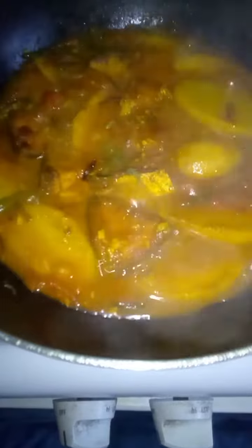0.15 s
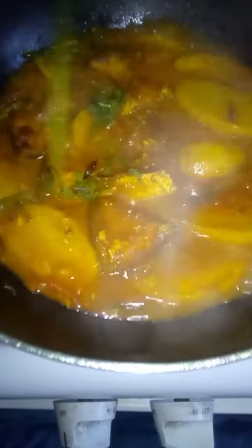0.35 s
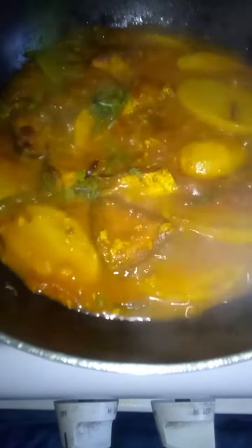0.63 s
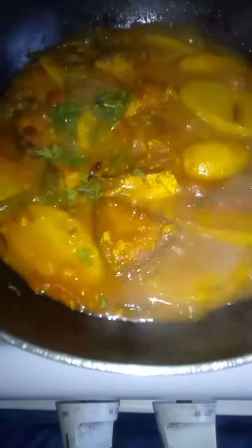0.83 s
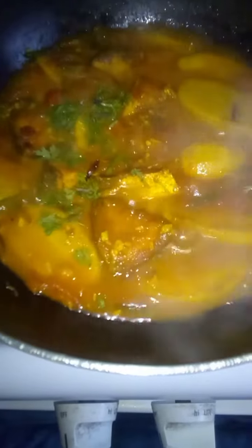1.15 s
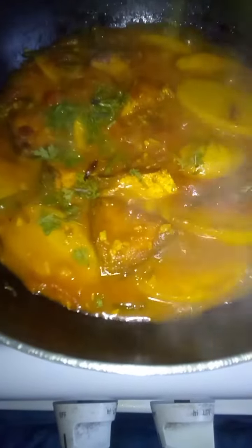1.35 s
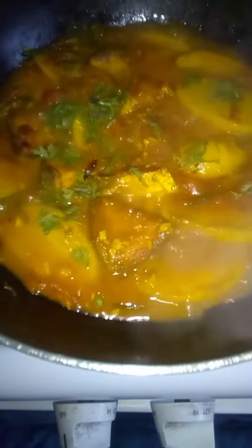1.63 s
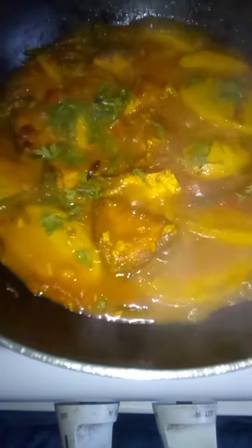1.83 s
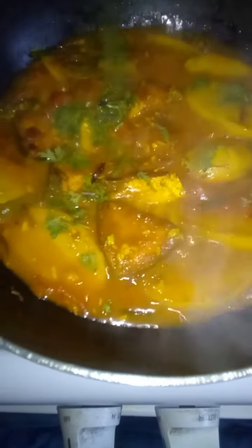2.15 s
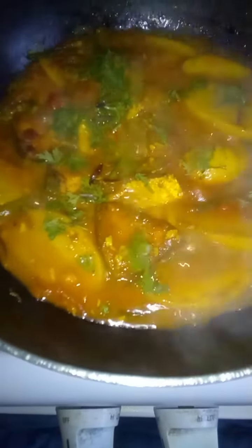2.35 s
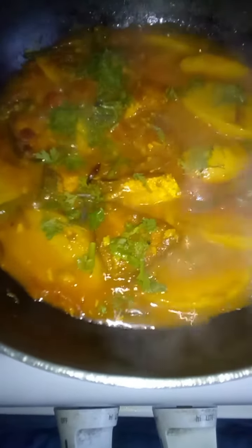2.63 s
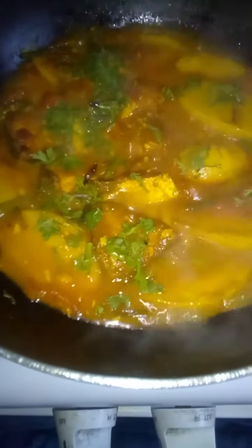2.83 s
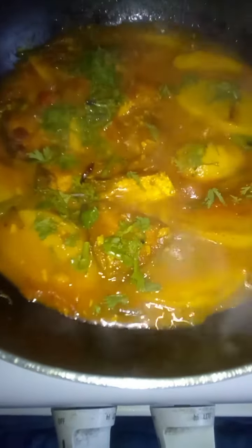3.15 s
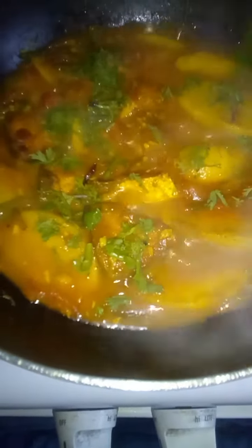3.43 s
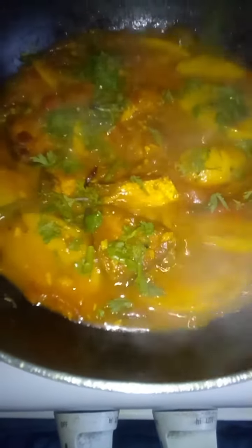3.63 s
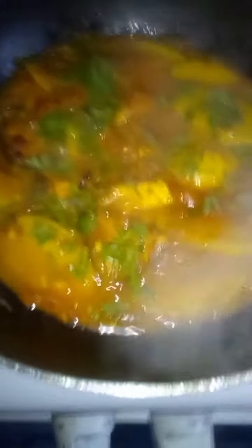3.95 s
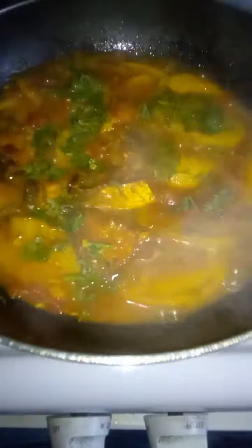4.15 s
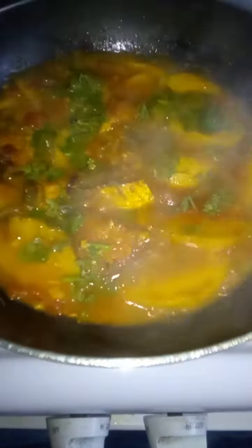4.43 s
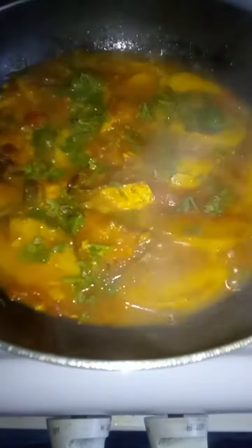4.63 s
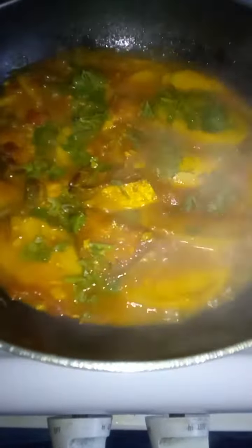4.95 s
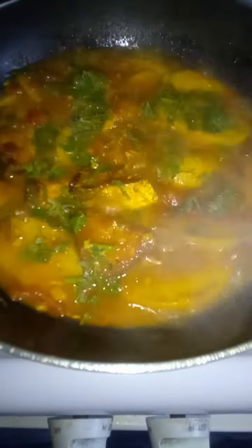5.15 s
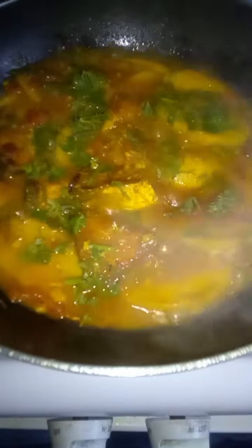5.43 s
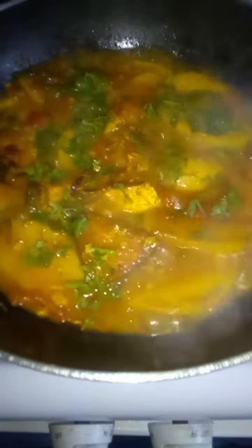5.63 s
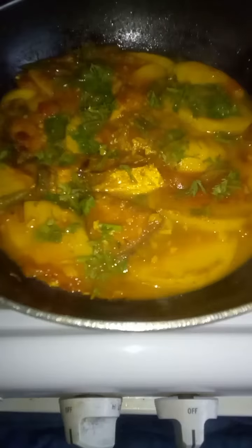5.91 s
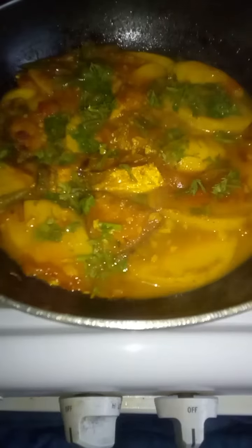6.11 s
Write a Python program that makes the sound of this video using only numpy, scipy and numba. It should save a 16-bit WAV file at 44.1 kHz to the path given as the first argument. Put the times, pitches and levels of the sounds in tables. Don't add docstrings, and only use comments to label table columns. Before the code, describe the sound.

Thick curry bubbles and sputters in a pan, wet pops and low glugs over a steady simmer, with a sharp knock and brief cuts.

```python
import sys
import numpy as np
from scipy import signal
from scipy.fft import rfft, irfft
from scipy.io import wavfile
from scipy.ndimage import uniform_filter1d
from numba import njit

SR = 44100
rng = np.random.default_rng(int(sys.argv[2]) if len(sys.argv) > 2 else 0)


def gain_from_db(level_db):
    decades = np.asarray(level_db, float) / 20
    return 10 ** decades


def inscribe(sig):
    pcm = np.round(np.clip(np.atleast_2d(sig).T, -1, 1) * 32767)
    wavfile.write(sys.argv[1], SR, pcm.astype(np.int16))


N = 276930


def level(x):
    return x / np.sqrt(np.mean(x ** 2))


@njit
def ring(start, hz, t60, rise, glide, size):
    out = np.zeros(N)
    for k in range(len(start)):
        first, phasor, swell = int(start[k] * SR), size[k] + 0j, 1.
        turn = np.exp(2j * np.pi * hz[k] / SR - np.log(1000) / (t60[k] * SR))
        bend = np.exp(2j * np.pi * glide[k] * (hz[k] / SR) ** 2)
        lag = np.exp(-1 / (rise[k] * SR))
        for j in range(max(first, 0), min(first + int(1.5 * t60[k] * SR), N)):
            phasor = phasor * turn
            turn = turn * bend
            swell = swell * lag
            out[j] += phasor.imag * (1 - swell) ** 2
    return out


def struck(start, peak_db, hz, t60, rise, glide):
    fall = t60 / np.log(1000)
    top = rise * np.log(1 + 2 * fall / rise)
    size = gain_from_db(peak_db) * np.exp(top / fall) * (1 + rise / fall / 2) ** 2
    return ring(start, hz, t60, rise, glide, size)


def walk(rate):
    hold = int(SR / rate)
    steps = np.repeat(rng.standard_normal(N // hold + 1), hold)
    return level(uniform_filter1d(uniform_filter1d(steps, hold), hold)[:N])


def band(x, lo_hz, hi_hz):
    return signal.sosfilt(signal.butter(4, [lo_hz, hi_hz], "bandpass", fs=SR, output="sos"), x)


def coloured(points):
    hz, db = np.transpose(points)
    f = np.fft.rfftfreq(N, 1 / SR) + 1
    gain = gain_from_db(np.interp(np.log(f), np.log(hz), db))
    return level(irfft(rfft(rng.standard_normal(N)) * gain, N))


# frequency in Hz, width in Hz, level in dB.
BOWL_MODES = [
    [(352, 120, -18.5), (540, 125, 3.5), (723, 120, -1.5), (1013, 252, -7), (2100, 50, -5),
     (2490, 231, -0.5), (3170, 47, -11), (3850, 250, -14), (4490, 220, -11), (5250, 520, -19),
     (6400, 600, -22)],
    [(340, 340, -38.5), (535, 110, 1), (716, 306, -4.5), (1106, 104, -7), (1703, 31, -10), (2140, 110, -.5),
     (2400, 88, -8), (2640, 56, -9), (3160, 660, -48), (3690, 220, -7), (4476, 290, -12), (5360, 1600, -24),
     (6400, 1300, -29)],
    [(341, 180, -37), (772, 340, 3), (1490, 590, -17), (2400, 880, -19.5), (3700, 330, -14),
     (4550, 840, -12), (6040, 1500, -14)],
]


def bowl(modes):
    f = np.fft.rfftfreq(4096, 1 / SR) + 1
    power = sum(gain_from_db(db) ** 2 / (1 + np.abs((f - hz ** 2 / f) / width) ** 2.426) for hz, width, db in modes)
    power = power / (1 + (f / 7000) ** 10)
    cepstrum = irfft(np.log(power))
    cepstrum[0] /= 2
    cepstrum[len(f):] = 0
    return irfft(np.exp(rfft(cepstrum)))


def kitchen(x):
    t60_s, tail_db, rim_s, rim_db = .11, -8.5, .005, -25
    t = np.arange(SR // 4) / SR
    tail = rng.standard_normal(len(t)) * 1000 ** (-t / t60_s) * (t > .002)
    tail *= gain_from_db(tail_db) / np.sqrt(np.sum(tail ** 2))
    tail[0] = 1
    tail[int(rim_s * SR)] += gain_from_db(rim_db)
    return signal.fftconvolve(x, tail)[:N]


def froth(lo_hz, hi_hz, cycles, spread_db, surge_db, steam_db, count):
    when, pitch, size, life = rng.random((4, count))
    hz = lo_hz * (hi_hz / lo_hz) ** pitch
    t60 = cycles * (0.29 + 2 * life ** 2) / hz
    size_db = spread_db * np.minimum(-np.log(size), 4)
    size_gain = gain_from_db(size_db) * np.sqrt(1 / t60)
    grains = ring(when * N / SR, hz, t60, t60 / 8, np.full(count, .002), size_gain)
    steam = level(band(rng.standard_normal(N), lo_hz, hi_hz))
    surge = gain_from_db(surge_db * walk(22.28) + 1.3 * walk(7))
    return kitchen((level(grains) + gain_from_db(steam_db) * steam) * surge)


def bursts(table, cycles, rise_share, spray_s, spray_octaves, spray_db):
    start, peak_db, hz = np.transpose(table)
    rise = rise_share * cycles / hz
    tone = struck(start, peak_db, hz, cycles / hz, rise, 0 * hz)
    wait, pitch, size = np.moveaxis(rng.random((len(hz), 10, 3)), 2, 0)
    wait = wait ** 1.5 + 0.092
    drop_start = (start[:, None] + spray_s * wait).ravel()
    drop_hz = np.minimum(hz[:, None] * 2 ** (spray_octaves * (2 * pitch - 1)), 9000).ravel()
    drop_db = (peak_db[:, None] + spray_db - 18 * wait - 8 * size).ravel()
    life = (6 + 45 * size.ravel() ** 3) / drop_hz
    spray = struck(drop_start, drop_db, drop_hz, life, life / 12, 0 * life)
    snap = struck(start + rise, peak_db + 1.5, hz, 2.9 / hz, 0.22 / hz, 0 * hz)
    return kitchen(tone), kitchen(spray + snap)


def stirred(table, share):
    lead_s, rise_s, settle_s, full_db = .006, .004, .026, -46
    start, peak_db, _ = np.transpose(table)
    at = (np.maximum(start - lead_s, 0) * SR).astype(int)
    kicks = np.bincount(at, np.minimum(gain_from_db(peak_db - full_db), 2), N)
    t = np.arange(SR // 4) / SR
    swell = np.exp(-t / settle_s) - np.exp(-t / rise_s)
    return 1 + share * signal.fftconvolve(kicks, swell)[:N]


# time in seconds, level in dB.
BOIL = [(0, -57), (.2, -64.5), (.3, -58), (.75, -56), (.92, -61), (1.2, -57), (1.5, -56.5), (1.63, -61.5),
        (1.77, -51), (1.86, -61.5), (1.97, -55.5), (2.5, -58.5), (3.86, -57), (4.33, -55), (4.45, -56),
        (4.8, -53), (5.1, -57), (5.66, -57)]


def boil_db(t, share):
    swing = np.interp(t, *np.transpose(BOIL))
    return swing.mean() + share * (swing - swing.mean())


def gurgling():
    return froth(250, 1620, 20.5, spread_db=3.0, surge_db=1.3, steam_db=-3.5, count=2000)


def sputtering():
    return froth(1500, 3500, 28.0, spread_db=3.0, surge_db=1.4, steam_db=-7, count=3500)


def spitting():
    return froth(3000, 7200, 60.0, spread_db=2.2, surge_db=1.8, steam_db=-3, count=4000)


def crackling():
    return froth(550, 6500, 4.3, spread_db=2.4, surge_db=3.0, steam_db=-11.5, count=2500)


def fizzing():
    return froth(2800, 7800, 100.0, spread_db=3.0, surge_db=-1.0, steam_db=-2.5, count=5000)


# frequency in Hz, level in dB per Hz.
RUMBLE = [(12, -63), (20, -32.5), (22, -27), (97, -2.5), (173, -4), (285, -3.5), (323, -2), (400, -7),
          (520, -26), (880, -120)]
# time in seconds, swell in dB.
GRIPS = [(.05, 1.5), (.48, 12), (.95, 8), (1.11, 6.5), (1.55, 10.5), (1.89, 9), (2.22, 6), (3.55, 3.5),
         (3.82, 8.5), (3.87, 11.5), (4.34, 7), (4.8, 5), (.72, 6), (1.42, 6)]


def burner_rumble(t):
    grip_s, sink_db_s = 0.028, 0.5
    grip_db = sum(db * np.exp(-((t - s) / grip_s) ** 2) for s, db in GRIPS)
    return coloured(RUMBLE) * gain_from_db(1.6 * walk(22) - sink_db_s * np.clip(t - 2, -1, 3) + grip_db)


# frequency in Hz, level in dB.
HISS = [(6000, -30), (7500, 0), (8500, -6), (13000, -7), (14200, -2), (15000, 1), (15700, 1), (15900, -30)]


def microphone_hiss():
    return coloured(HISS) * gain_from_db(.6 * walk(18))


# start in seconds, peak in dB, pitch in Hz.
BUBBLE_POPS = [(0.1306, -46, 2490), (0.267, -45.5, 2640), (0.2892, -40, 2490), (0.359, -43, 2550),
               (0.4726, -47, 2530), (0.4868, -43.5, 2490), (0.5232, -39.5, 2380), (0.679, -46.5, 2500),
               (0.71, -49, 2170), (0.709, -38.5, 2450), (0.856, -42, 2520), (0.9636, -39, 2610),
               (0.9641, -36.5, 2454), (1.0273, -44, 2480), (1.0431, -40.5, 2340), (1.117, -47, 2450),
               (1.148, -50, 2600), (1.174, -41, 2570), (1.2045, -40.5, 2540), (1.244, -38.5, 2450),
               (1.2874, -51, 2540), (1.3062, -35, 2300), (1.3422, -38.5, 2400), (1.358, -48, 2270),
               (1.4433, -45, 2580), (1.4432, -43.5, 2340), (1.527, -41.5, 2260), (1.6546, -46, 2600),
               (1.6698, -40, 2640), (1.73, -70, 2600), (1.76, -55, 2470), (1.7893, -40, 2210),
               (1.917, -31.5, 2490), (2.162, -62, 2330), (2.1789, -50, 3040), (2.1792, -34, 2520),
               (2.25, -41.5, 2550), (2.281, -37, 2560), (2.28, -37, 2490), (2.3464, -44, 2360),
               (2.422, -50, 2490), (2.6346, -48.5, 2620), (2.6844, -40.5, 2640), (2.816, -44, 2700),
               (2.8461, -37.5, 2490), (2.8888, -44, 2490), (2.9682, -42.5, 2420), (3.0525, -61, 2510),
               (3.0872, -51, 1840), (3.0866, -45.5, 2590), (3.182, -39, 2460), (3.26, -49, 2450),
               (3.3102, -46.5, 2490), (3.4351, -44, 2220), (3.4673, -37.5, 2360), (3.521, -52, 2330),
               (3.527, -41.5, 2560), (3.5993, -38.5, 2400), (3.726, -59, 2400), (3.767, -43.5, 2490),
               (4.2108, -48, 2100), (4.2677, -65, 2200), (4.3989, -55, 2370), (4.4029, -41.5, 2140),
             (4.4587, -44, 2100), (4.4792, -44, 2160), (4.5181, -48, 2350), (4.6089, -49, 2250),
             (4.6323, -43, 2030), (4.7296, -52, 2140), (4.7451, -48, 2100), (4.7785, -57, 2030),
             (4.8309, -45.5, 2640), (4.8543, -43.5, 2086), (4.9516, -69, 2110), (4.9741, -62, 2170),
             (4.987, -48.5, 2640), (5.0639, -49.5, 2140), (5.1048, -46, 2210), (5.2026, -68, 2140),
             (5.2195, -58, 2150), (5.2973, -56, 2040), (5.4525, -49.5, 2210), (5.4999, -65, 2060),
             (5.5228, -60, 2030), (5.5408, -56, 2150), (5.5612, -59, 1860), (5.5612, -48.5, 2100),
               (.001, -36.5, 2480), (0.046, -65, 2500), (0.973, -38, 2530), (1.498, -45, 2560),
             (2.325, -53, 2440), (2.568, -42.5, 2420), (3.325, -49, 2400), (3.9267, -40, 2490),
             (4.05, -38.5, 2470), (4.494, -44.5, 2153), (5.7516, -44.5, 2110)]
POPS = BUBBLE_POPS


def pops():
    return bursts(POPS, 13.0, 0.96, 0.03, 0.29, -5.0)


# start in seconds, peak in dB, pitch
# in Hz.
BUBBLE_SPITS = [(0.063, -65, 4560), (0.1306, -40, 4270), (0.2914, -53, 3600), (0.3173, -40, 4580),
                (0.398, -50.5, 4400), (0.431, -52, 3720), (0.4911, -44.5, 3880), (0.6376, -57, 3690),
                (0.6952, -66, 3820), (0.9587, -59.5, 4060), (1.053, -61, 3700), (1.175, -49, 3360),
                (1.2264, -48.5, 4650), (1.284, -64, 4400), (1.3274, -52, 3850), (1.343, -47.5, 3900),
                (1.4134, -48.5, 4150), (1.5274, -57, 4400), (1.6077, -58, 4560), (1.806, -57, 3730),
                (1.954, -49.5, 3500), (2.019, -51, 4560), (2.097, -56, 3700), (2.118, -47, 3670),
                (2.1595, -60, 3700), (2.21, -60, 3820), (2.2492, -39, 3890), (2.357, -36, 5130),
                (2.4067, -46.5, 4550), (2.4837, -53, 3720), (2.685, -55.5, 4300), (2.701, -46.5, 3900),
                (2.8163, -55, 3400), (2.832, -50.5, 3620), (2.8465, -44.5, 5480), (2.9932, -50, 3840),
                (3.0855, -53, 3690), (3.1517, -53, 4500), (3.3095, -48.5, 4380), (3.388, -59, 4380),
                (3.4181, -56, 4600), (3.5316, -54, 4340), (3.659, -60, 4300), (3.677, -60, 4430),
                (3.7958, -58.5, 3730),
                (0.2904, -46, 3290), (0.4184, -48.5, 3020), (0.6952, -44, 3000), (0.965, -54, 3170),
         (1.175, -44.5, 3170), (1.283, -61, 3050), (1.328, -49, 3200), (1.4097, -53, 3160),
         (1.6058, -55, 3180), (2.0183, -50, 3170), (2.1, -63, 3170), (2.1153, -50, 3200),
         (2.161, -51, 3120), (2.213, -45.5, 3210), (2.4191, -47.5, 3080), (2.716, -47.5, 3290),
         (2.819, -51, 2980), (2.832, -53, 3180), (3.1806, -48.5, 3060), (3.2622, -50, 3160),
         (3.466, -47, 2950), (3.5282, -53, 3100), (3.601, -51.5, 3050), (3.797, -56, 3040),
         (3.827, -53, 3160),
                (4.1892, -52, 3500), (4.2925, -55.5, 3840), (4.3259, -55, 3670), (4.3594, -53.5, 3850),
              (4.3953, -58, 3860), (4.4077, -51.5, 3690), (4.5075, -59, 3800), (4.5838, -72, 3530),
              (4.6422, -72, 3620), (4.7415, -55, 3800), (4.754, -52, 3400), (4.8258, -57, 3950),
              (4.9066, -52.5, 3840), (4.9884, -51, 3730), (5.0643, -43, 4340), (5.1575, -53, 3740),
              (5.185, -62, 3540), (5.2029, -54, 3570), (5.2718, -59, 3530), (5.3137, -52.5, 3630),
              (5.3666, -51.5, 4230), (5.4633, -51, 3690), (5.5472, -67, 3800), (5.6025, -51.5, 3600)]
SPITS = BUBBLE_SPITS


def spits():
    return bursts(SPITS, 24.0, 0.84, 0.043, 0.52, 15.0)


# start in seconds, peak in dB,
# pitch in Hz.
BUBBLE_GLUGS = [(0.129, -43.5, 550), (0.258, -49, 514), (0.296, -63, 506), (0.344, -46, 560),
                (0.38, -43, 543), (0.466, -51, 750), (0.522, -52, 562), (0.595, -50.5, 522),
                (0.639, -46, 486), (0.682, -45.5, 477), (0.964, -56, 503), (1.032, -59, 575),
                (1.063, -33, 941), (1.181, -47.5, 640), (1.214, -49.5, 535), (1.266, -50, 600),
                (1.342, -68, 513), (1.376, -53, 584), (1.499, -45, 525), (1.659, -44, 565),
                (1.728, -49.5, 540), (1.789, -37, 730), (1.836, -48, 552), (1.935, -42, 570),
                (2.118, -57, 500), (2.142, -47, 590), (2.178, -42.5, 697), (2.287, -51.5, 610),
                (2.324, -57, 530), (2.345, -47.5, 467), (2.467, -71, 600), (2.512, -49.5, 524),
                (2.595, -48.5, 455), (2.645, -43, 502), (2.747, -69, 509), (2.783, -50, 766),
                (2.817, -48, 745), (2.846, -63, 530), (2.944, -49.5, 660), (3.016, -47, 535),
                (3.119, -50.5, 526), (3.194, -45.5, 606), (3.228, -49.5, 504), (3.347, -51, 537),
                (3.532, -40, 536), (3.602, -41.5, 503), (3.736, -55, 526.6), (3.757, -54, 564),
                (3.814, -61, 605), (3.846, -41.5, 886),
                (4.216, -48.5, 693), (4.307, -61, 523), (4.368, -43, 555), (4.438, -53, 517),
              (4.493, -47.5, 516), (4.576, -50.5, 560), (4.668, -50, 527), (4.689, -49, 553),
              (4.727, -45.5, 522), (4.818, -46, 526), (4.934, -50.5, 520), (4.955, -59, 500),
              (5.025, -52, 514), (5.086, -53, 522), (5.191, -74, 544), (5.223, -57, 540), (5.262, -43, 535),
              (5.297, -49.5, 540), (5.389, -70, 496), (5.509, -53, 634), (5.612, -54, 585),
              (5.63, -51, 620),
                (0.198, -54, 960), (0.298, -48.5, 1030), (0.486, -42.5, 1120), (0.958, -49.5, 960),
         (1.219, -52, 1160), (1.288, -63, 910), (1.985, -40.5, 915), (2.306, -44, 960),
         (2.749, -50.5, 1070), (2.846, -45, 925), (3.435, -48.5, 1350), (3.549, -41, 910),
         (3.619, -44.5, 840), (4.417, -45.5, 1000), (4.469, -50, 1160), (5.21, -53.5, 910),
         (5.298, -47, 1090)]
GLUGS = BUBBLE_GLUGS


def glugs():
    return bursts(GLUGS, 8.5, .4, .05, .7, -6.0)


# start in seconds, peak in dB.
SPLASHES = [(0.1324, -54), (0.2399, -60.5), (0.2902, -56), (0.3187, -51), (0.3975, -55.5), (0.4633, -55),
            (0.6315, -56.5), (0.6978, -63), (0.7412, -59), (1.0271, -64), (1.051, -59.5), (1.1747, -59),
            (1.2266, -56), (1.2945, -63), (1.3219, -60), (1.4137, -58), (1.6082, -59), (1.6681, -66),
            (1.7045, -63), (1.7933, -66), (1.8243, -61), (1.9545, -51), (2.0193, -53), (2.1156, -55),
            (2.1794, -65), (2.2493, -52), (2.2932, -58), (2.3179, -55), (2.356, -40), (2.4059, -56),
            (2.5438, -55), (2.614, -60), (2.6848, -61), (2.817, -53.5), (2.8464, -49.5), (2.9377, -57.5),
            (2.988, -49.5), (3.0859, -58), (3.1497, -58), (3.3089, -57), (3.3867, -64), (3.4181, -58.5),
            (3.5309, -65), (3.6586, -60), (3.711, -59), (3.8272, -59), (3.9083, -36), (3.9424, -57),
            (4.0078, -55.5), (4.0497, -50), (4.7506, -55), (4.9152, -56.5), (5.064, -48), (5.2589, -59),
            (5.5468, -60.5), (5.6885, -59.5)]


def splashes():
    rise_s, top_db = .0035, -48
    start, peak_db = np.transpose(SPLASHES)
    kicks = np.bincount((start * SR).astype(int), gain_from_db(np.minimum(peak_db, top_db)), N)
    t = np.arange(SR // 4) / SR

    def envelope(t60_s):
        return signal.fftconvolve(kicks, 1000. ** (-t / t60_s) * (1 - np.exp(-t / rise_s)))[:N]

    swell = envelope(.14) * gain_from_db(-4.5)
    click = envelope(.005) * gain_from_db(-11.5) * rng.standard_normal(N)
    return swell, band(click, 3500, 8000)


# start in seconds, peak in dB, pitch in Hz.
WHISTLES = [(.283, -77, 8100), (.458, -53, 6460), (.458, -69, 5300), (.458, -66, 5670), (.458, -87, 7940),
            (.742, -61.5, 6490), (.742, -66, 5270), (1.993, -73.5, 9110), (2.317, -60, 6400),
            (2.317, -58, 5250), (2.546, -63, 5686)]


def whistles():
    start, peak_db, hz = np.transpose(WHISTLES)
    return kitchen(struck(start, peak_db, hz, 0.045 + 0 * hz, 0.0063 + 0 * hz, 0 * hz))


# start in seconds, peak in dB,
# pitch in Hz.
SQUEAKS = [(0.2908, -57, 6630), (0.4628, -63, 6400), (0.7437, -64, 6400), (1.0276, -62, 6800),
           (1.1747, -57, 6900), (1.6681, -66, 6650), (2.0196, -57.5, 6540), (2.25, -44, 5970),
           (2.3176, -54, 6500), (2.356, -39.5, 6120), (2.548, -59, 5700), (2.8175, -59, 6200),
           (2.8465, -56, 5550), (3.3096, -60, 6400), (3.829, -61, 6450), (4.049, -51, 5960)]


def squeaks():
    return bursts(SQUEAKS, 30.0, 0.072, 0.044, .1, 6.7)


# start in seconds, peak in dB, pitch in Hz, T60 in seconds, rise in seconds.
THUDS = [
    (3.9073, -15.5, 143, .021, .03),
    (3.812, -48, 170, .03, .004),
    (3.83, -50, 230, .03, .004),
    (3.868, -50, 160, .03, .005),
    (5.743, -49, 870, 0.012, .004),
    (5.7522, -29, 910, 0.0027, 0.00094),
]
# start in seconds, peak in dB, pitch in Hz, T60 in seconds, glide per cycle.
RAPS = [(3.9090, -13, 917, 0.0065, 0.06), (3.9103, -18.5, 625, 0.014, -0.02), (3.9205, -37.5, 100, .03, 0),
        (3.911, -27.5, 250, 0.05, 0.0092), (5.699, -36.5, 133, 0.026, -0.11),
        (5.6895, -37, 1060, 0.016, 0.027), (5.6915, -32.5, 690, 0.021, -0.019),
        (3.9088, -30.5, 6000, .005, 0), (3.9087, -45.5, 12000, .004, 0), (3.9087, -39, 14800, .009, 0.0092),
        (3.9095, -33, 1300, .012, 0)]


def knocks():
    thuds = struck(*np.transpose(THUDS), np.full(len(THUDS), -.1))
    start, peak_db, hz, t60, glide = np.transpose(RAPS)
    return thuds + struck(start, peak_db, hz, t60, np.maximum(.18 / hz, .0001), glide)


# start in seconds,
# peak in dB.
JOLTS = [
    (3.909, -55),
    (3.9235, -70),
    (4.043, -68),
    (5.6885, -76),
]


def capsule_rattle(t):
    t60_s = .025
    jolts = sum(gain_from_db(db) * (t >= s) * 1000. ** -np.clip((t - s) / t60_s, 0, 9) for s, db in JOLTS)
    return level(band(rng.standard_normal(N), 5000, 15500)) * jolts


# start in seconds, end in seconds.
SHOTS = [
    (0, 4.054),
    (4.098, 5.756),
    (5.887, 6.28),
]
# gurgle in dB, sputter in dB, spit in dB, crackle in dB, rumble level in dB.
MIX = [
    (0, -4.5, -18.5, -13, -70),
    (-3, -10, -14, -17, -71),
    (-18.5, -27.5, -29, -30, -74.5),
]


def scene():
    t = np.arange(N) / SR
    froths = [gurgling(), sputtering(), spitting(), crackling(), fizzing()]
    rumble, hiss = burner_rumble(t), microphone_hiss()
    tones, spray = np.sum([pops(), spits(), glugs(), squeaks()], axis=0)
    swell, clicks = splashes()
    tones += whistles() + knocks()
    rattle = capsule_rattle(t)
    drive_db = [boil_db(t, share) for share in (0.93, 1, 0.74, 1)]
    churn = [stirred(GLUGS, 0.79), stirred(POPS, 0.8), stirred(SPITS + SQUEAKS, 1.8)]
    churn.append(churn[1])
    out = np.zeros(N)
    for (t0, t1), (*mix, rumble_db), fade_s, modes in zip(SHOTS, MIX, [.002, .17, .22], BOWL_MODES):
        inside = signal.fftconvolve([*froths, spray], bowl(modes)[None], axes=1)[:, :N]
        *crowd, wet, drops = inside
        bed = rumble * gain_from_db(rumble_db)
        for x, stir, drive, db in zip(crowd, churn, drive_db, mix):
            bed = bed + level(x) * stir * gain_from_db(drive + db)
        fade = np.clip((t - t0) / fade_s, 0, 1)
        sound = bed + drops + tones + level(wet) * swell + clicks + rattle
        sound = sound * (fade ** 2.5 + gain_from_db(-34))
        sound += hiss * gain_from_db(-94.5) * (fade ** 2.7 + 0.32)
        gate = uniform_filter1d(1. * ((t >= t0) & (t < t1)), size=44)
        gate += gain_from_db(-47) * ((t >= t1) & (t < t1 + .013))
        out += sound * gate
    return out[None]


def roll_off(x):
    return signal.sosfilt(signal.butter(12, 16740, fs=SR, output="sos"), x)


def record(dry):
    heard = signal.sosfilt(signal.butter(3, 52, "highpass", fs=SR, output="sos"), dry)
    heard = signal.sosfilt(signal.butter(8, 16300, fs=SR, output="sos"), heard)
    return roll_off(heard)


dry = scene()
out = record(dry)
inscribe(out)
```